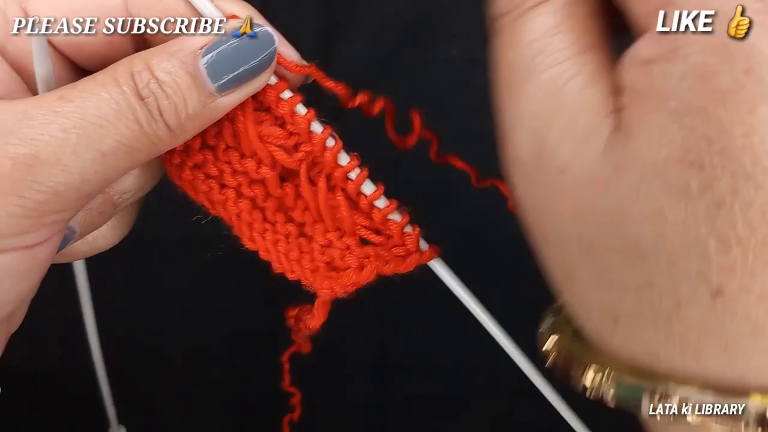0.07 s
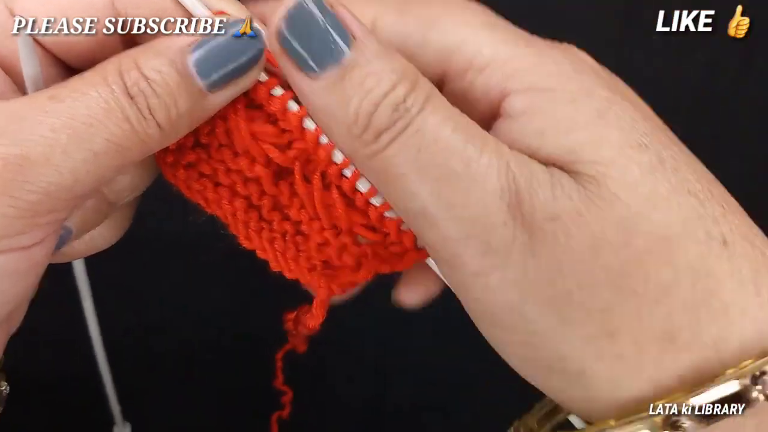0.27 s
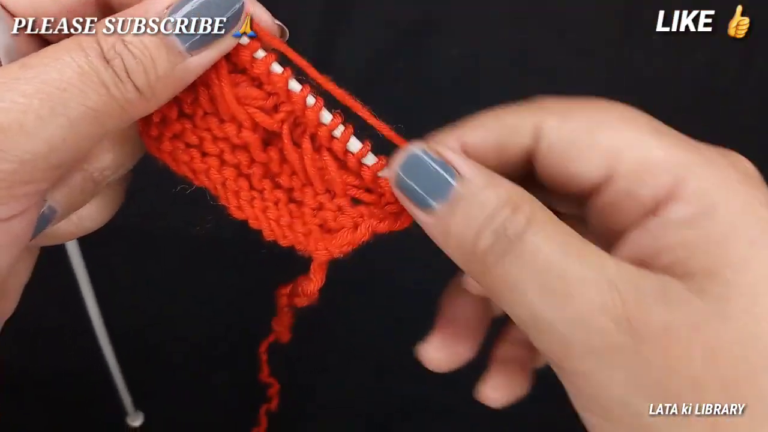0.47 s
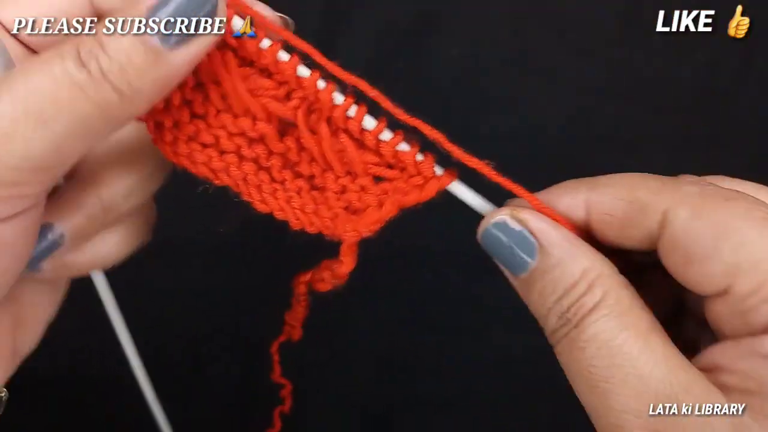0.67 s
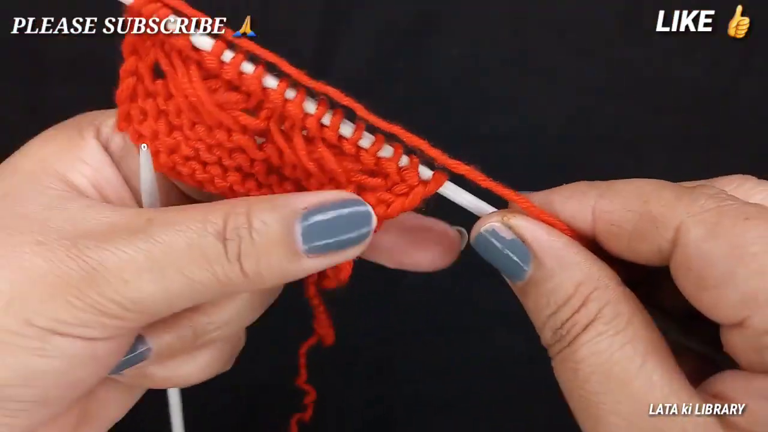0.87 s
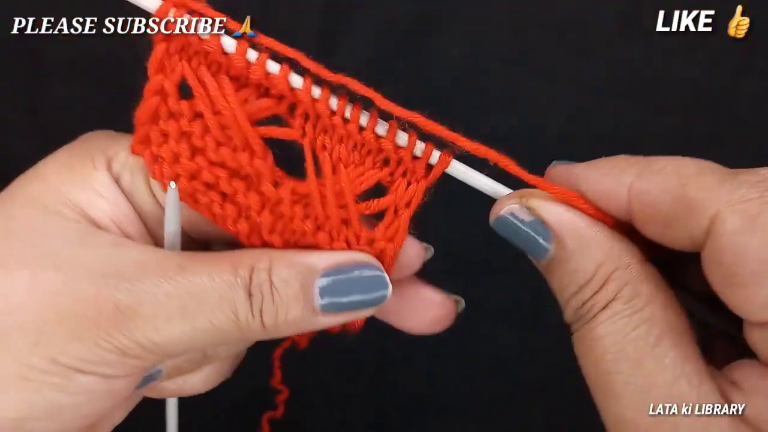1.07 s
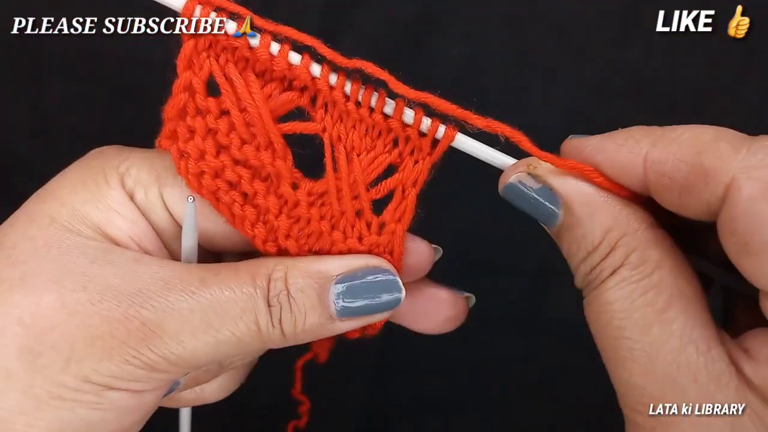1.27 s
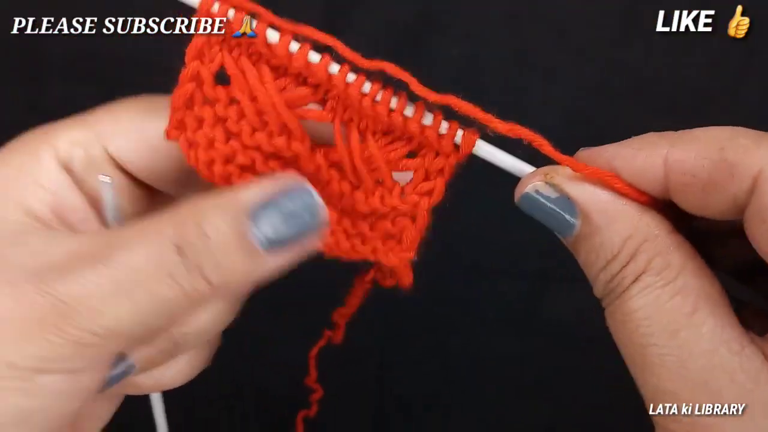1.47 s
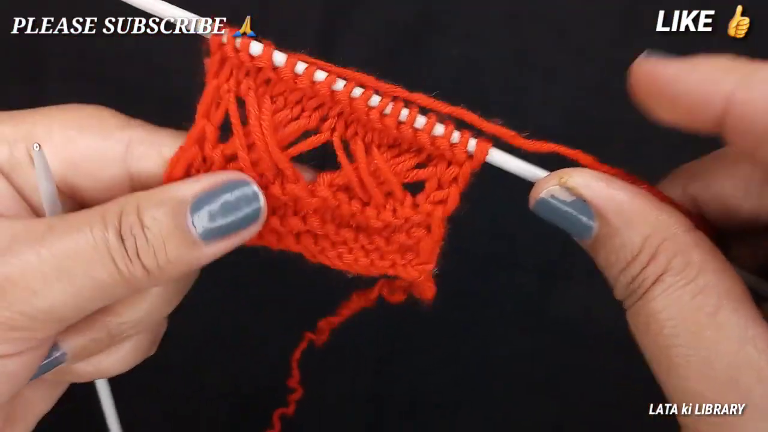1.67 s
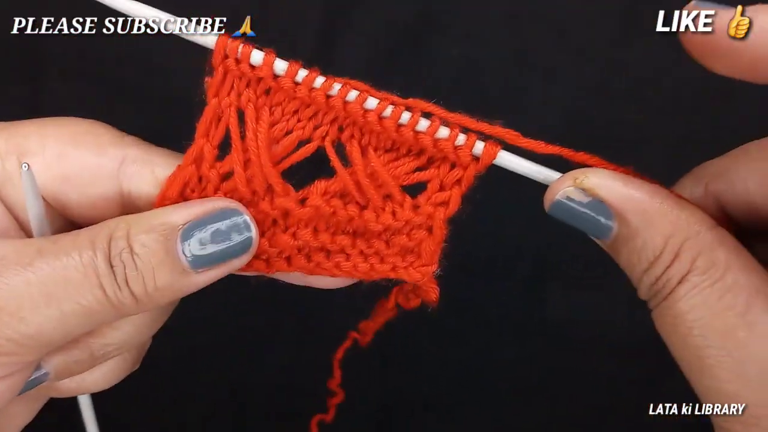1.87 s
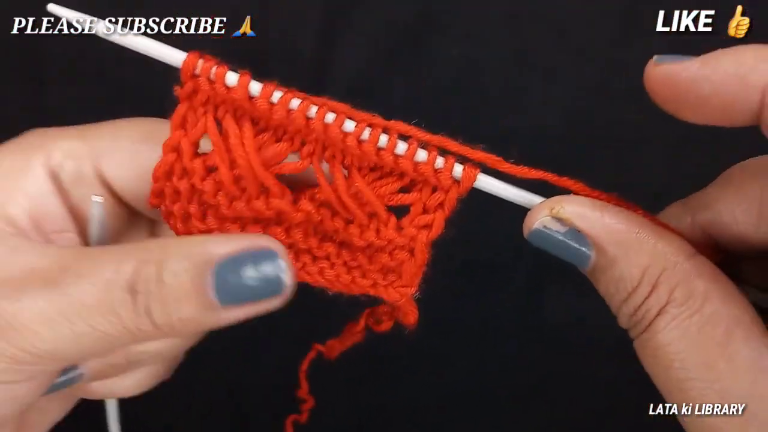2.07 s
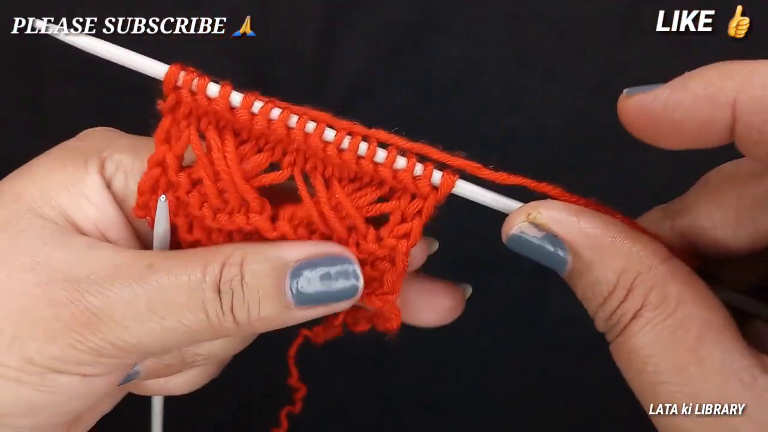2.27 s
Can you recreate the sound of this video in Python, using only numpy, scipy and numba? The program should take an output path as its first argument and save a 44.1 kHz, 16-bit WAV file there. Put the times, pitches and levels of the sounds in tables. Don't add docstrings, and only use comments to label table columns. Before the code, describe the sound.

Metal knitting needles tap and slide faintly, strike once with a sharp bright click, then scrape briefly. Soft yarn rustles and faint clock ticks follow in a quiet room, close microphone, light hiss.

```python
import sys
import numpy as np
from scipy import signal
from scipy.fft import rfft, irfft, next_fast_len
from scipy.io import wavfile
from scipy.ndimage import uniform_filter1d, map_coordinates
from numba import njit

SR = 44100
rng = np.random.default_rng(int(sys.argv[2]) if len(sys.argv) > 2 else 0)


def log_audio(samples):
    frames = np.atleast_2d(samples).T
    limited = np.clip(frames, -1, 1)
    pcm = np.round(limited * 32767).astype(np.int16)
    wavfile.write(sys.argv[1], SR, pcm)


def voltage_ratio(level):
    return 10 ** (np.asarray(level, float) / 20)


N = 102576
T = np.arange(N) / SR


def first_slide():
    # start_s, level_db, high_modes_extra_db, top_modes_extra_db
    catches = [(.3743, -45, -10, 4), (.3766, -50, -13, -2), (.3785, -75, -11, -1), (.3856, -44.5, -22, 6),
               (.3883, -50, -17.5, -4), (.3945, -47.5, -2, 4.5), (.3975, -56, -14, 2), (.4073, -54, 3, -3),
               (.413, -63, -8, -10), (.4187, -73, 12, 6), (.4235, -68, 0, -10), (.4308, -50, -3, 4),
               (.4398, -59, 17, 7), (.4415, -61.5, 18, -10), (.4472, -63.5, -8, 14), (.457, -77, 9, -11)]
    # time_s, level_db, high_modes_extra_db, top_modes_extra_db
    pressure = [
        (.372, -76, -8, 10),
        (.376, -56, -2, 8),
        (.382, -74, -22, 10),
        (.389, -65, -9, -2),
        (.41, -55.5, -2, 9),
        (.422, -52, 4, -5),
        (.445, -55, 2, -3),
        (.458, -58, 12, 5),
        (.461, -64, 9, 8),
    ]
    return struck(catches, column=3) + slide(pressure, column=3)


def strike():
    # start_s, level_db, high_modes_extra_db, top_modes_extra_db
    blows = [
        (.4983, -28.5, 5, 9),
        (.4985, -35, 10.5, -3),
        (.4987, -19, 16, -15),
        (.4993, -25.5, 5, -13),
        (.5000, -51.5, 17, -17),
        (.5007, -29.5, -3, -14),
        (.5023, -35, -4, -9),
    ]
    return struck(blows, column=2)


def second_slide():
    # start_s, level_db, high_modes_extra_db, top_modes_extra_db
    late_catches = [
        (.5065, -47, 6.5, -4),
        (.5075, -55, -13, -12.5),
        (.5112, -45.5, 6, 0),
        (.5145, -47, 7.5, 2.5),
        (.52, -44, 15, 4),
        (.5265, -53, 10, 10),
        (.5335, -44, 13, 2),
        (.5385, -49, 7, 2),
        (.5455, -56, -2, 12),
    ]
    # time_s, level_db, high_modes_extra_db, top_modes_extra_db
    pressure = [
        (.501, -55, 4, -2),
        (.506, -60, 1, 8),
        (.512, -48, -8, -5),
        (.522, -47.5, -7, -14),
        (.53, -58, 2, 4.5),
        (.54, -43.5, -5, 5.5),
        (.544, -69, 3, 7),
        (.553, -71, -15, 4),
        (.565, -85, 0, -3),
    ]
    return slide(pressure, column=4) + struck(late_catches, column=4)


def struck(rows, column):
    s, db, high, top = np.array(rows).T
    return needle([clicks(s, db), clicks(s, db + high), clicks(s, db + top)], column)


def slide(rows, column):
    grains_per_s, grain_spread_db = 9000, 2.2
    judder_db, judder_per_s = 1.8, 350
    scratch_db = -35
    s, db, high, top = np.array(rows).T
    chance, sign, size = rng.random((3, N))
    grains = (chance < grains_per_s / SR) * np.sign(sign - .5)
    grains = grains * voltage_ratio(-grain_spread_db * np.log(size + 1e-9))
    pressure_db = np.interp(T, s, db, left=-200, right=-200)
    rub = unit(grains) * voltage_ratio(pressure_db + judder_db * walk(judder_per_s))
    drives = [rub, rub * voltage_ratio(np.interp(T, s, high)), rub * voltage_ratio(np.interp(T, s, top))]
    return needle(drives, column, damped=1) + voltage_ratio(scratch_db) * thin(rub)


def needle(drives, column, damped=0):
    # pitch_hz, t60_s, struck_db, first_slide_db, second_slide_db
    needle_modes = [(1820, .04, -30.5, -15, -22), (2560, .011, -25.5, -8, -14), (3080, .01, -21, -3, -8),
                    (4300, .011, -18, -6, -13), (4860, .01, -21, 1, 0), (5330, .01, -10, -3, 2),
                    (6000, .013, -10, -3, -4), (6340, .009, -24, -4, -7), (7780, .007, -12, -14, -7),
                    (8350, .006, -12, -13, -13), (11800, .0062, -10, -3, 6), (12400, .005, -30, -17, -4),
                    (13750, .0045, 0, 0, -20), (14150, .0045, -12, -16, 5)]
    # time_s, pitch_factor
    creep_points = [(.385, .99), (.41, .995), (.46, 1.03), (.497, .995), (.54, 1.0)]
    high_from_hz, top_from_hz, low_below_hz = 10000, 13000, 2500
    low_slide_db = -12
    wobble, wobble_per_s = .018, 90
    n = int(.66 * SR)
    out = np.zeros(N)
    creep = np.interp(T[:n], *np.array(creep_points).T)
    for mode in needle_modes:
        pitch_hz, t60, level_db = mode[0], mode[1], mode[column]
        group = int(pitch_hz > high_from_hz) + int(pitch_hz > top_from_hz)
        hz = pitch_hz
        if group > 1:
            hz = pitch_hz * creep
        elif damped and group < 1:
            hz = pitch_hz / creep
        if damped:
            hz = hz * (1 + wobble * walk(wobble_per_s)[:n] / (1 + group))
            if pitch_hz < low_below_hz:
                level_db = level_db + low_slide_db
        evening = (t60 * SR / 10) ** (damped / 2)
        out[:n] += voltage_ratio(level_db) * ring(drives[group][:n], hz, t60) / evening
    return thin(out)


def yarn():
    # start_s, rise_s, fall_s, level_db, treble_extra_db
    rubs = [
        (.70, 0.024, 0.14, -65.5, -1.5),
        (1.07, 0.048, 0.099, -70.5, 0),
        (1.159, 0.031, 0.051, -81, 13),
        (1.444, 0.028, 0.031, -67, -2.5),
        (1.5, 0.048, 0.29, -77, -8),
        (1.7, 0.015, 0.085, -69.5, -4),
        (2.04, 0.014, 0.047, -72.5, -1),
    ]
    # start_s, level_db
    snaps = [
        (1.098, -58.5),
        (1.188, -64),
        (1.462, -62),
        (1.477, -58),
    ]
    # pitch_hz, level_db
    body_colour = [(1500, -19), (3000, -8), (5000, -0.5), (8000, -11.5), (10000, -15)]
    treble_colour = [(10000, -20), (13000, -4.5), (16000, -1.5)]
    swells = []
    for start, rise, fall, db, _ in rubs:
        fade_in = np.clip((T - start) / rise, 0, 1)
        fade_out = np.exp(-np.clip(T - start - rise, 0, None) / fall)
        swells.append(voltage_ratio(db) * fade_in * fade_out)
    swells = np.array(swells)
    treble_gain = voltage_ratio(np.array(rubs)[:, -1])
    fibres = rng.standard_normal(N) * voltage_ratio(1.3 * walk(250))
    rustle = swells.sum(axis=0) * unit(colour(fibres, body_colour))
    rustle = rustle + treble_gain @ swells * unit(colour(fibres, treble_colour))
    snap = clicks(*np.array(snaps).T)
    snapping = ring(snap, 4600, 0.0031) + voltage_ratio(2) * ring(snap, 8200, 0.0022) + voltage_ratio(1) * ring(snap, 12000, 0.0018)
    return rustle + thin(snapping)


def hand():
    # start_s, level_db, pitch_hz, t60_s
    knocks = [
        (0.4995, -49.5, 1300, 0.0072),
        (0.555, -58, 231, 0.022),
        (.58, -58.5, 48.6, 0.55),
    ]
    out = np.zeros(N)
    for s, db, hz, t60 in knocks:
        body = ring(clicks([s], [db], width_s=.0001), hz, t60)
        out = out + signal.sosfilt(signal.butter(2, hz * .5, "high", fs=SR, output="sos"), body)
    return out


def clock():
    # pitch_hz, t60_s, level_db
    case_modes = [(1190, .016, -5), (1620, .007, -3), (1880, .008, -3), (3760, .02, 1), (3960, .018, 1),
                  (4260, .016, 0), (5250, .01, -6), (5800, .01, -10)]
    # start_s, level_db
    ticks = [(.64, -56.5), (0.652, -59), (0.665, -46.5), (.678, -52), (.687, -51.5), (.697, -59),
             (0.703, -59), (.718, -63), (.733, -60.5), (.756, -62), (.781, -58), (1.656, -58.5),
             (1.667, -52), (1.672, -50), (1.687, -57), (1.698, -56.5), (1.706, -57.5), (1.716, -59.5),
             (1.736, -62)]
    tick_low_db, tock_low_db, tock_from_s = -9, -13, 1.2
    s, db = np.array(ticks).T
    full_push = clicks(s, db)
    low_push = clicks(s, db + np.where(s < tock_from_s, tick_low_db, tock_low_db))
    out = np.zeros(N)
    for hz, t60, level_db in case_modes:
        push = low_push if hz < 2500 else full_push
        out = out + voltage_ratio(level_db) * ring(push, hz, t60)
    return out


def drone():
    # time_s, level_db
    drone_levels = [
        (.98, -100),
        (1.04, -77.5),
        (1.2, -83),
        (1.3, -84),
        (1.45, -80),
        (1.53, -79.5),
        (1.62, -100),
    ]
    s, db = np.array(drone_levels).T
    breath = unit(ring(rng.standard_normal(N), 507, 0.092))
    return breath * voltage_ratio(np.interp(T, s, db, left=-200, right=-200))


def room(x, shimmer_s=0):
    # pitch_hz, t60_s, level_db
    room_decay = [(1500, 0.27, 12), (3000, 0.43, -2), (5000, 0.46, -6), (8000, 0.23, 11),
                  (13000, 0.26, -2.5)]
    edges = [500, 2100, 3900, 6300, 10000, 18000]
    gap_s, shimmer_per_s = 0.015, 300
    t, tail = T[:SR // 2], 0
    for (_, t60, db), lo, hi in zip(room_decay, edges, edges[1:]):
        band_pass = signal.butter(2, [lo, hi], "band", fs=SR, output="sos")
        band = signal.sosfilt(band_pass, rng.standard_normal(SR // 2))
        tail = tail + band * voltage_ratio(db - 60 * t / t60)
    tail = tail * np.clip(t / gap_s, 0, 1)
    wet = signal.fftconvolve(x, tail / np.sqrt(np.sum(tail ** 2)))[:N]
    return map_coordinates(wet, [(T + shimmer_s * walk(shimmer_per_s)) * SR], mode="mirror")


def air():
    # pitch_hz, level_db
    rumble_colour = [(12, -41), (20, -9), (55, -0.5), (151, -4), (251, -16.5), (313, -14), (348, -18.5),
                     (416, -17.5), (700, -21), (910, -67), (1540, -120)]
    hiss_colour = [(700, -2.5), (1500, -5.5), (3800, -7), (5500, -9.5), (9600, -15), (12000, -13),
                   (14800, -7.5), (15800, 1)]
    # pitch_hz, level_under_centre_db
    side_width = [(60, -37), (110, -68), (200, -28.5), (380, -21.5), (700, -17), (1290, -13.5),
                  (2380, -13.5), (4400, -11.5), (8120, -1), (15000, -5)]
    both = []
    for _ in range(2):
        rumble = unit(colour(rng.standard_normal(N), rumble_colour)) * voltage_ratio(-63.5 - 1.5 * walk(10.23))
        hiss = unit(colour(rng.standard_normal(N), hiss_colour)) * voltage_ratio(-69.5 - 1.39 * walk(3.9))
        both.append(rumble + hiss)
    width = [(10, side_width[0][1])] + list(side_width) + [(20000, side_width[-1][1])]
    return both[0], colour(both[1], width)


def clicks(times, dbs, width_s=.000012):
    out = np.zeros(N)
    for s, db in zip(times, dbs):
        i = int(s * SR) + np.arange(-30, 31)
        push = np.exp(-.5 * ((i / SR - s) / width_s) ** 2)
        out[i] += voltage_ratio(db) * push / push.sum()
    return out


def ring(x, hz, t60):
    rise_share = .2
    fall = np.log(1000) / (max(t60, .002) * SR)
    fast = np.exp(-fall / rise_share)
    turn = 2 * np.pi * hz / SR * np.ones(len(x))
    return 2 * (1 - fast) * resonate(x, turn, np.exp(-fall), fast)


@njit
def resonate(x, turn, slow, fast):
    y, a, b = np.empty(len(x)), 0j, 0j
    for i in range(len(x)):
        spin = np.exp(1j * turn[i])
        a = a * spin * fast + x[i] + 1e-18
        b = b * spin * slow + a
        y[i] = b.imag
    return y


def thin(x):
    return signal.sosfilt(signal.butter(4, 1500, "high", fs=SR, output="sos"), x)


def unit(x):
    return x / np.sqrt(np.mean(x ** 2))


def colour(x, points):
    hz, db = np.array(points).T
    n = next_fast_len(len(x))
    f = np.log(np.arange(n // 2 + 1) * SR / n + 1e-9)
    gain = voltage_ratio(np.interp(f, np.log(hz), db, left=-90, right=-90))
    return irfft(rfft(x, n) * gain, n)[:len(x)]


def walk(rate):
    k = int(SR / rate)
    steps = np.repeat(rng.standard_normal(N // 20)[:N // k + 1], k)
    return unit(uniform_filter1d(uniform_filter1d(steps, k), k)[:N])


def scene():
    room_db, room_width_db = -12, -44
    clock_direct_db, clock_room_db = -8.5, -6
    near = first_slide() + strike() + second_slide() + yarn()
    far = clock()
    mid, side = air()
    mid = mid + near + hand() + drone()
    mid = mid + voltage_ratio(room_db) * room(near, shimmer_s=.00005)
    mid = mid + voltage_ratio(clock_direct_db) * far + voltage_ratio(clock_room_db) * room(far)
    side = side + voltage_ratio(room_width_db) * room(voltage_ratio(room_db) * near + far)
    return np.array([mid + side, mid - side])


def roll_off(x):
    return signal.sosfilt(signal.butter(12, 16460, fs=SR, output="sos"), x)


def record(dry):
    mix = signal.sosfilt(signal.ellip(8, .5, 36, 15400, fs=SR, output="sos"), dry)
    return roll_off(mix)


dry = scene()
out = record(dry)
log_audio(out)
```